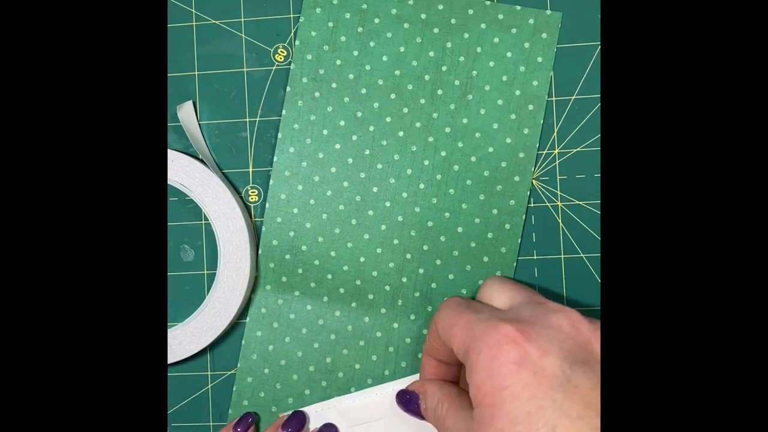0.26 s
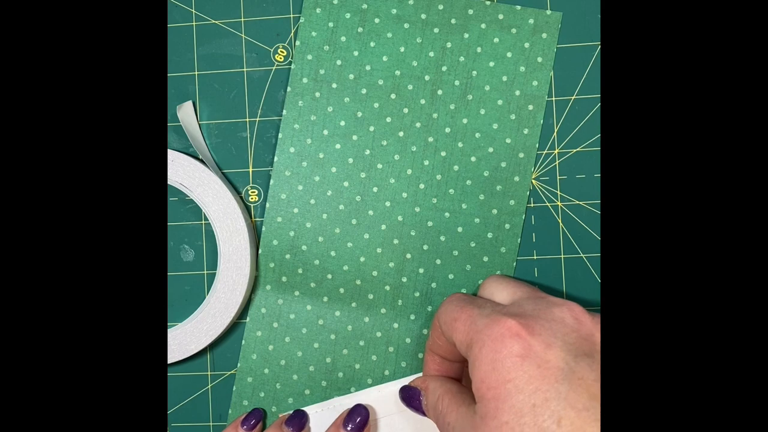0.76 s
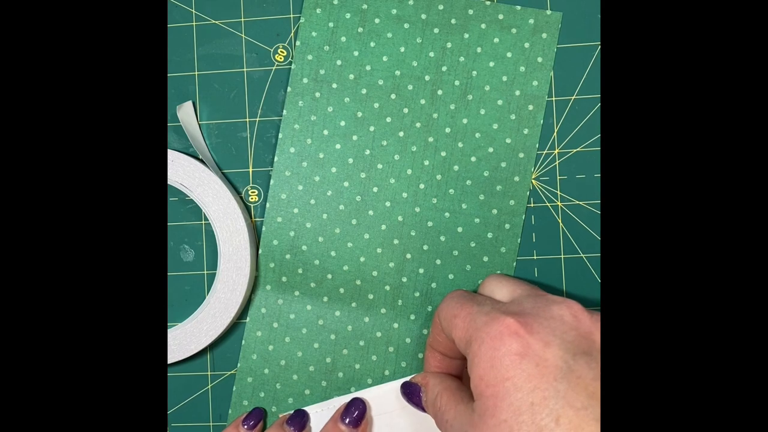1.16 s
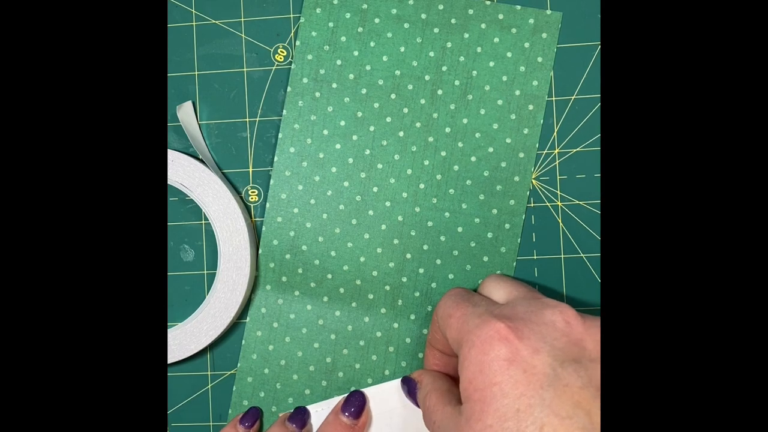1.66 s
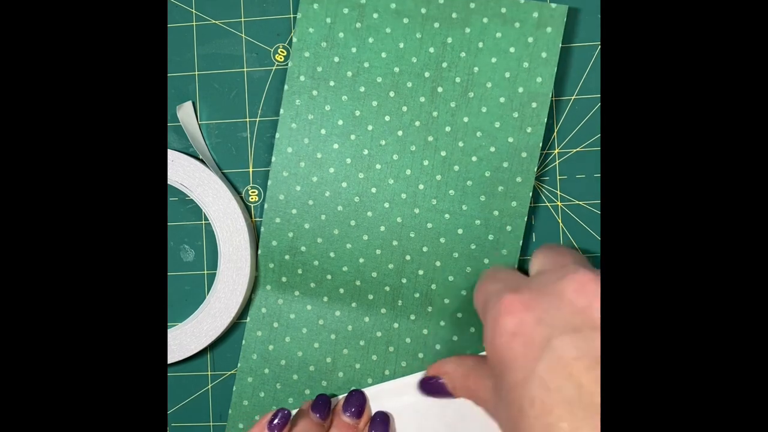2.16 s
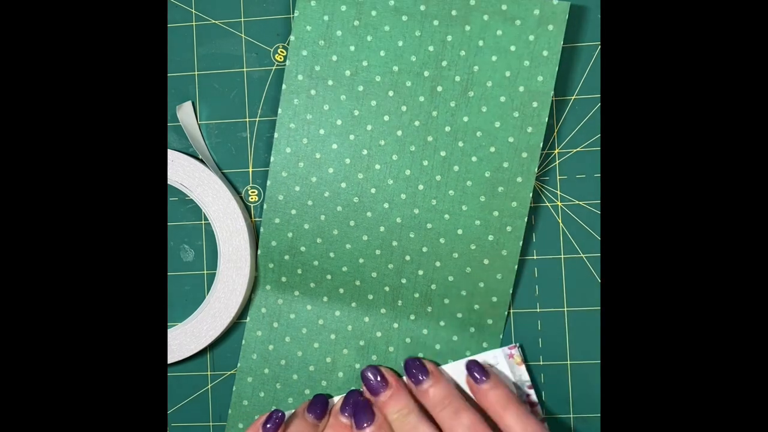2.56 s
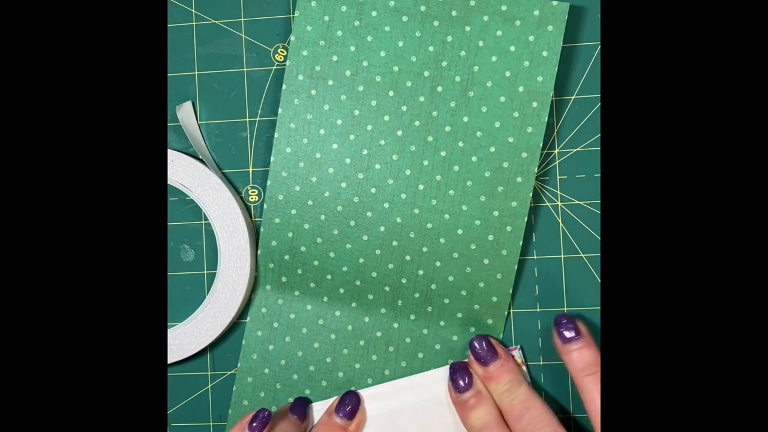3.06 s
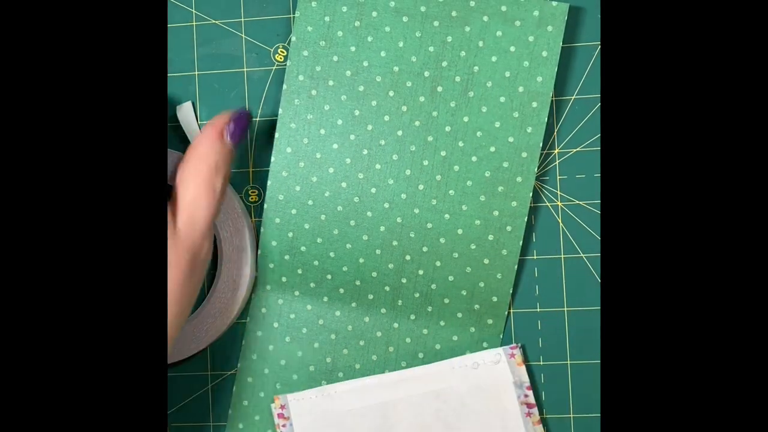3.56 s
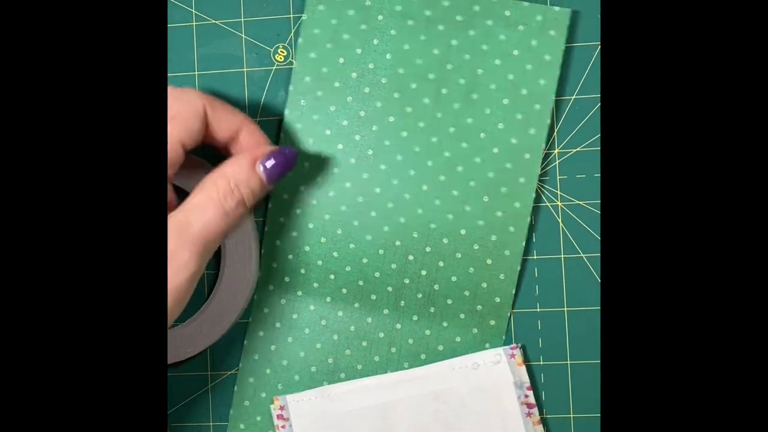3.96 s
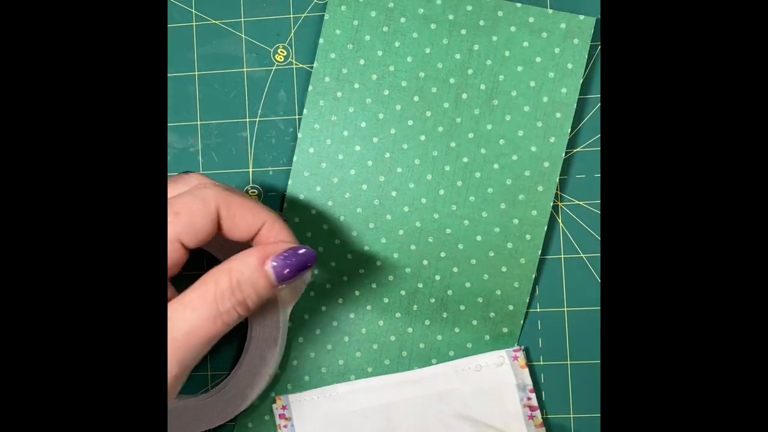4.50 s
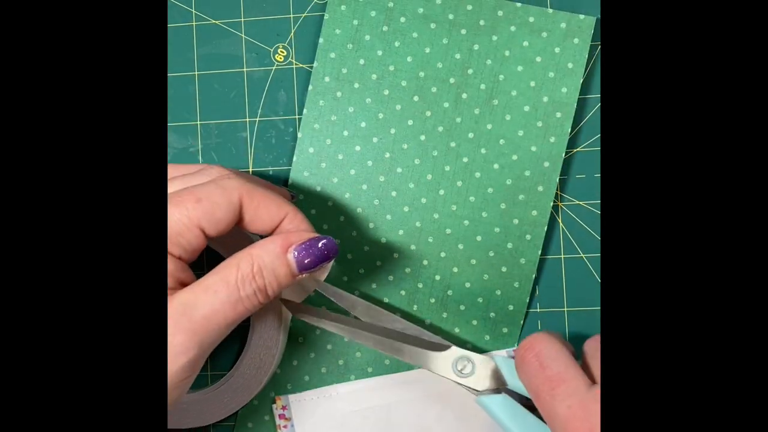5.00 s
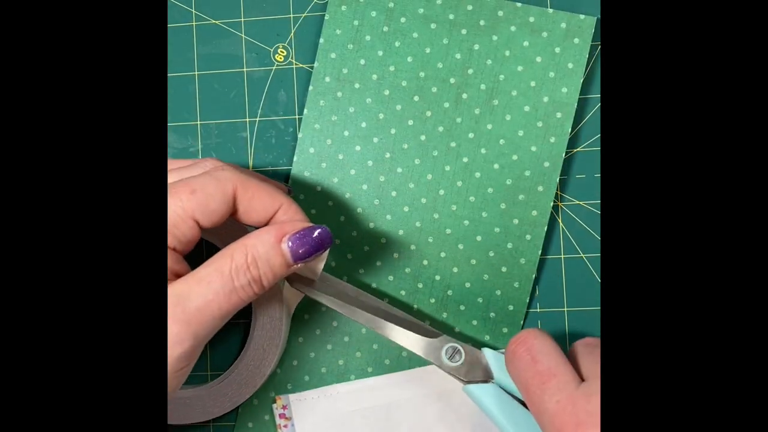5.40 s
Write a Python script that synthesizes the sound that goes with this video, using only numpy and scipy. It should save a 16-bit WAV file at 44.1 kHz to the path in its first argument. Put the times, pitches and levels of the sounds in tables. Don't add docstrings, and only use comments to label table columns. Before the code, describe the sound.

A steady low fan and mains hum sit under faint, tiny bubble-like drips. Hands barely stir the paper, then smooth and fold it with rustles, dry cracks and dull table thuds. A cardboard tape roll clatters and booms, the loudest moment. Quiet handling follows, then one bright metallic snip near the end. Close overhead phone, indoors, short reverberation.

```python
import sys
import numpy as np
from scipy import signal
from scipy.fft import rfft, irfft, next_fast_len
from scipy.io import wavfile
from scipy.ndimage import map_coordinates

SR = 44100
rng = np.random.default_rng(int(sys.argv[2]) if len(sys.argv) > 2 else 0)


def volts_from_db(level):
    exponent = np.asarray(level, float) / 20
    return 10 ** exponent


def store_pcm(level_fs):
    pcm = np.round(np.clip(level_fs, -1, 1) * 32767).astype(np.int16)
    wavfile.write(sys.argv[1], SR, np.atleast_2d(pcm).T)


N = 248724

# (start [s], hold [s], crease [dB], hiss re crease [dB])
RUBS = [(0, 0.013, -63, -28), (0.198, 0.0057, -71, 5), (.285, 0, -76, 9), (0.677, 0, -77, 7),
        (1.31, 0, -76, 8), (1.753, 0.074, -78, 3), (1.893, 0.038, -49, -2), (1.974, 0.055, -56, -3),
        (2.101, 0, -58.5, 11), (2.22, 0.023, -45.5, 7.5), (2.374, 0.11, -61, 4), (2.59, 0.032, -49, 6.5),
        (2.664, 0.13, -57, -0.5), (2.822, 0.15, -55.5, 4), (2.99, 0.000039, -47, 9), (3.103, 0.1, -61, 1),
        (3.228, 0, -43.5, -1), (3.427, 0.25, -61.5, -13), (3.73, 0.035, -45, -9.5),
        (3.803, 0.031, -49, -32.5), (3.962, 0.05, -44, -29), (3.99, 0, -51.5, 4), (4.04, 0, -37.5, 0.5),
        (4.076, 0.022, -39.5, -4), (4.14, 0, -49, -1), (4.262, 0.015, -58.5, -0.5), (4.283, 0.056, -69, 22),
        (4.36, 0.14, -65, -2.5), (5.287, 0, -73.5, 7), (5.435, 0.061, -69.5, 3), (5.459, 0, -53, 10.5),
        (5.49, .03, -57.5, 11.5), (5.544, 0.011, -45, 12), (5.583, 0, -67, 8), (5.64, 0.0079, -42, -30)]
# (start [s], hold [s], level [dB])
PRESSES = [(0, 0.06, -54), (.3, 0.26, -57.5), (1.4, 0.25, -62), (1.6, 0.018, -57), (1.72, .02, -58),
           (1.78, .04, -56.5), (1.92, 0.0078, -37.5), (2.11, 0.03, -43.5), (2.22, 0.018, -43.5),
           (2.47, 0.0086, -48.5), (2.58, 0, -42), (2.74, 0, -43), (2.99, 0.13, -46), (3.63, 0.11, -53),
           (3.68, 0.13, -42), (3.965, 0, -34), (4.0, 0.15, -42.5), (4.17, 0.019, -35), (4.47, 0.058, -59)]
# (frequency [Hz], density [dB per Hz])
PAPER_BODY = [(150, 9.5), (400, 5.5), (1300, 4), (2200, -7), (4000, -24.5)]
PAPER_CREASE = [(900, -11.5), (1900, 3.5), (3400, 5), (4400, -4.5), (5600, 0.5), (7500, -11), (9500, -35.5)]
PAPER_HISS = [(5500, -13.5), (8000, 3), (10000, 4.5), (12500, -3), (14500, 3.5), (15750, 1), (15900, -25.5)]
# (body [dB], crease [dB], hiss [dB])
RESTING_DB = (-62.5, -83.5, -83.5)
HELD_DB = (-78, -76, -77)
# (time [s], peak [dB], crack [dB])
TICKS = [(2.4385, -44.5, 20), (2.263, -45, 3), (.782, -49.5, 5), (1.0067, -49, 6), (1.3054, -54, 2.5),
         (3.962, -45, 18), (3.9772, -42, 16.5), (4.055, -42, 16), (4.254, -49, -7), (4.4594, -50, 9),
         (4.6125, -55.5, -8), (4.71, -52.5, 1), (4.98, -51, 8), (5.2408, -67, 16.5), (5.272, -50.5, 19.5),
         (5.5592, -36, 23.5), (5.638, -45.5, 15)]
# (time [s], peak [dB], ring [Hz], wood [dB], crack [dB])
SNAPS = [(.033, -44, 2280, -20, -9), (1.43, -46.5, 3000, -9, -28), (1.708, -50, 750, -12, -41),
         (1.7158, -52, 990, -18, -50), (1.725, -50, 1260, 5, -30), (1.7875, -45, 1500, -12, -30),
         (1.809, -49, 1270, -8, -8), (1.8657, -40.5, 2700, -14, -12), (1.9119, -36, 1710, 10, -11),
         (2.0118, -23.5, 1900, -7.5, 5.5), (2.0153, -29.5, 2100, -1, 7), (2.0187, -32.5, 2700, -9, 10),
         (2.048, -40, 1590, -5, -9), (2.088, -25.5, 1805, -11, -32), (2.2115, -38, 890, -6, -12),
         (2.439, -31.5, 2270, 3.5, -20), (2.5325, -37, 1540, -4.5, -10), (2.7357, -40.5, 1170, 7, -17),
         (2.9817, -35, 970, -31, -13), (3.0976, -44, 1370, -16, -19), (3.188, -44, 1310, -17, -8)]
# (time [s], peak [dB], ring [Hz], wood [dB], edge [dB])
KNOCKS = [(3.5555, -29, 1640, 1.5, -6), (3.5893, -32, 1820, 3.5, -1.5), (3.6713, -24.5, 1450, -19, -9),
          (3.6922, -32, 1380, 0.5, 2.5), (3.7059, -19, 940, 2.5, 3.5), (3.7226, -10, 2110, -8.5, 4.5),
          (3.7237, -7, 2600, -19, -27.5), (3.7252, -10.5, 2470, -15.5, -19.5),
          (3.7359, -22, 2160, -0.5, -33.5), (3.7481, -31, 2160, -21.5, -8.5), (3.875, -33, 1300, 4, -23),
          (3.935, -30.5, 940, 3, -22), (3.9574, -25.5, 1240, -4.5, -22), (3.9624, -22, 1720, -0.5, 0),
          (4.0223, -11, 2120, -9.5, -29), (4.033, -23, 1714, -18, -2), (4.056, -20.5, 2600, -8.5, 3),
          (4.071, -28, 1640, -24, -18), (4.1305, -13, 1557, -25, -5.5), (4.13, -42, 2940, -32, -23),
          (4.1433, -19.5, 948, -24.5, -34), (5.529, -42, 3380, -25, -6), (5.5586, -13, 2600, -26, 4),
          (5.5596, -13.5, 2980, -14.5, -7.5), (5.6375, -26.5, 3400, -35, -15)]
# (time [s], peak [dB], ring [Hz])
CRACKLES = [(1.7127, -51, 1000), (1.7198, -47, 1010), (1.7225, -60, 2900), (1.73, -60, 1510),
            (1.742, -54, 2900), (1.764, -66, 3200), (1.7885, -55, 2800), (1.809, -49, 2800),
            (1.847, -51, 2290), (1.882, -43, 2980), (1.889, -43, 1700), (2.0997, -48, 1800),
            (2.152, -42, 1910), (2.552, -37, 1570), (2.567, -41, 650), (2.578, -35.5, 2800),
            (2.62, -46, 2300), (2.965, -43, 1360), (2.982, -34.5, 2800), (3.071, -53, 1090),
            (3.128, -51, 1400), (3.221, -41, 2260), (3.647, -48, 1720), (3.6703, -26.5, 2700),
            (3.914, -43, 1400), (3.936, -30, 2300), (3.9426, -31, 2600), (3.948, -40, 1870),
            (3.9561, -23, 2330), (3.994, -30.5, 1800), (4.013, -34, 1790), (4.0384, -22, 1650),
            (4.045, -29.5, 2400), (4.052, -28.5, 1800), (5.5534, -33, 2810), (5.5633, -42, 2550),
            (5.5649, -23, 2980), (5.571, -26, 2300), (3.729, -20, 2300), (3.7418, -28, 2500),
            (3.755, -27.5, 2400), (4.156, -37, 1680), (4.179, -26, 1090), (4.192, -34, 2900)]
# (time [s], peak [dB], edge re crack [dB])
FLICKS = [(1.866, -46, -9), (2.1967, -41, -9), (2.2112, -31, -13), (2.5996, -30, -12), (2.9759, -33, -14),
          (3.5552, -41.5, -6), (3.5893, -39.5, -6), (3.6705, -35.5, -3.5), (3.6929, -26.5, -13),
          (3.7058, -26.5, -7.5), (3.7222, -20.5, -14.5), (3.9068, -43.5, -10), (4.0056, -33.5, -15),
          (4.0201, -30, 9.5), (4.057, -19, -14), (4.1303, -24, -18), (5.5285, -35, -14)]
# (frequency [Hz], level [dB], t60 [s])
FLAP_MODES = [(390, -4, 0.054), (840, -1, 0.05), (924, -1, 0.041), (1253, 8, 0.033), (1934, -7, 0.053),
              (2390, -4, 0.045), (3320, -4.5, 0.027), (3820, -19, 0.045)]
ROLL_MODES = [(628, -2.5, 0.063), (943, -11, 0.045), (1056, -1, 0.052), (1141, 2.5, 0.043),
              (1680, -11, 0.025), (1748, -8.5, 0.054), (2600, -12, 0.033), (2870, -1.5, 0.012),
              (2950, -8, 0.01), (4160, -31, .02), (4800, -18, 0.0198)]
CORE_MODES = [(692, -6.5, .06), (1046, -14, 0.05), (1149, -7.5, .06), (1633, -11.5, .04), (2150, -6, 0.084),
              (2250, -8.5, 0.06), (2440, -8, .05), (2580, -6.5, 0.04), (2690, -8, .05), (2990, -8.5, 0.04),
              (4100, -13.5, .06), (4870, -8, 0.061), (5195, -11, .05), (5927, -17, .04)]
PAD_MODES = [(1080, -10, .035), (1190, 8, .04), (1310, -7, .035)]
# (time [s], level [dB])
FLAP_SLAPS = [
    (2.4388, -28),
]
ROLL_DROPS = [
    (4.1306, -10.5),
    (4.0225, -31.5),
]
CORE_CRACKS = [
    (3.7222, -13),
    (3.725, -16.5),
]
PAD_TAPS = [
    (1.7128, -53),
    (1.7156, -41.5),
]
# (time [s], peak [dB], frequency [Hz], t60 [s])
THUMPS = [(2.1055, -24, 139, 0.044), (1.915, -31, 236, 0.043), (2.017, -26.5, 116, 0.18),
          (2.1125, -17.5, 72.3, 0.15), (2.227, -31.5, 66.4, 0.1), (2.445, -23, 117, 0.077),
          (2.737, -28, 109, 0.069), (3.559, -25.5, 163, 0.094), (3.592, -20.5, 133, 0.1),
          (3.726, -21, 244, 0.086), (3.738, -23, 118.7, 0.19), (3.877, -28, 135.4, 0.095),
          (4.026, -19.5, 131, 0.073), (4.133, -21, 126.5, 0.089), (4.16, -29.5, 74.6, 0.22)]
# (time [s], peak [dB], frequency [Hz], t60 [s])
BOOMS = [(2.09, -35.5, 303, 0.062), (3.03, -34.5, 254, 0.098), (3.728, -25.5, 298, 0.19),
         (4.137, -30, 307, 0.099), (3.706, -28.5, 612, 0.096), (3.556, -30.5, 403, 0.11),
         (3.591, -22, 390, 0.032), (3.721, -20, 577, 0.084), (3.877, -34.5, 313, 0.19),
         (4.02, -26.5, 295.6, 0.093), (4.135, -22.5, 550, 0.13)]
# (start [s], hold [s], level [dB])
BLADE_SLIDES = [
    (5.445, .02, -60),
    (5.5, .02, -58),
    (5.535, .03, -47),
    (5.59, .015, -58),
]
# (time [s], bubble [Hz], level [dB])
DRIPS = [(.301, 4030, -59.5), (.36, 3700, -62), (.445, 4350, -57.5), (.499, 4800, -64), (.616, 4100, -64),
         (.645, 4140, -61), (.675, 3570, -56), (.786, 4400, -64), (.785, 2780, -66), (.82, 3520, -60.5),
         (.86, 3800, -73), (1.64, 4200, -73), (4.33, 4700, -53), (4.77, 3970, -75), (1.08, 5030, -60),
         (1.125, 4570, -60), (1.197, 4850, -54), (1.255, 3750, -56), (1.305, 2850, -62), (1.43, 4050, -64),
         (1.562, 3040, -67.5), (4.195, 4240, -47.5), (4.378, 4520, -47), (4.425, 4020, -54),
         (4.823, 4200, -54), (4.85, 3090, -53), (5.086, 3810, -59), (5.35, 4160, -49)]
DROPLETS = [(.04, 5770, -61.5), (.335, 6400, -68), (.4, 7100, -71), (.58, 7000, -68.5), (.675, 7040, -62),
            (.903, 5720, -62.5), (1.104, 5640, -60.5), (1.43, 7240, -64), (1.515, 6940, -61.5),
            (2.13, 6600, -53.5), (2.382, 6760, -51.5), (3.441, 5540, -62), (3.52, 6160, -56),
            (3.525, 7000, -66), (5.125, 7000, -58.5)]
# (frequency [Hz], density [dB per Hz])
FAN_RUMBLE = [(20, -23.5), (38, -15.5), (55, -0.5), (125, 1.5), (230, -6.5), (290, -14.5), (660, -29.5),
              (1200, -29)]
AIR_HISS = [(1400, -20), (1750, -27.5), (2300, -40), (7500, -46), (11100, -48.5), (14000, -70),
            (16000, -47)]
# (time [s], level [dB])
DRAUGHT = [(0, 12), (.3, 3.5), (.45, 0.5), (1.0, -3), (1.57, -4.5), (2.09, 11), (3.02, 2.5), (3.42, -2.5),
           (4.29, -7), (4.51, -6), (4.67, 4.5), (4.92, 4), (5.17, -11.5), (5.64, -3.5)]
# (mains multiple [1], rms [dB])
HUM = np.array([(1, -65.0), (2, -51.5), (3, -64), (4, -60.0), (5, -67), (7, -80.0), (14, -79.5),
       (19, -105.5), (23, -92.0), (24, -69.5), (25, -94.5), (26, -78.0), (28, -73.5), (30, -79.0)])
# (frequency [Hz], likeness [0..1])
NEAR_LIKENESS = [(250, .8), (600, .3), (1100, .4), (2000, .9), (5300, .6), (7200, .85), (8200, .985),
                 (16000, .995)]
AIR_LIKENESS = [(60, 0.99), (290, 0.79), (640, .15), (1400, 0.1), (3100, 0.75), (7000, 0.31), (8600, 0.37),
                (15000, 0.9)]
# (frequency [Hz], t60 [s])
ROOM_T60 = [(150, 0.75), (500, 0.037), (1500, 0.14), (4000, 0.18), (10000, 0.1)]
# (frequency [Hz], phase [half turns])
PORT_PHASE = [(1700, 0), (2400, .2), (5900, .4), (7200, 0), (8600, -1), (11300, -2), (13500, -3),
              (16000, -4)]
# (frequency [Hz], level [dB])
PORT_TILT = [(300, 0), (1500, -1), (3100, -4.5), (4400, -1.5), (5600, -6.5), (7500, -1), (8400, 3.2)]
# (frequency [Hz], gain [dB])
MICROPHONE = [(20, -14), (45, 0), (13000, 0), (14800, 4), (15720, 10), (15860, -20), (16800, -26),
              (17200, -45)]

LIFTED_S = 4.4
RISE_DB_PER_S, FALL_DB_PER_S = 301.5, 354.5
PATCH_DB, PATCH_HZ, PATCH_S = 3.5, 696, .025
SMOOTH_ABOVE_HZ = 5000
TICK_HZ, TICK_WOOD_DB, TICK_EDGE_DB = 2700, -15, -11
SNAP_EDGE_DB = -2.5
KNOCK_CRACK_DB = -37
DULL_DB = -27
RATTLE_T60_S = 0.015
SKEW_RAD, SKEW_HZ = 1.2, 750
SWELL_CYCLES, RIGHTWARD = 1, .3
BLADE_LOW_HZ, BLADE_HIGH_HZ = 7000, 10800
AIR_DB, DUCT_DB, DUCT_HZ, MAINS_HZ = -40.5, -59.5, 228.8, 60.52


def rms_one(x):
    return x / np.sqrt(np.mean(x ** 2) + 1e-20)


def at_hz(points, hz):
    table_hz, values = np.transpose(points)
    return np.interp(np.log(hz + 1), np.log(table_hz), values)


def shaped(x, gain):
    size = next_fast_len(x.shape[-1])
    spectrum = rfft(x, size) * gain(np.fft.rfftfreq(size, 1 / SR))
    return irfft(spectrum, size)[..., :x.shape[-1]]


def band(x, low_hz, high_hz):
    edges_hz = [low_hz, min(high_hz, .45 * SR)]
    return signal.sosfilt(signal.butter(2, edges_hz, "band", fs=SR, output="sos"), x)


def drift(rate_hz):
    steps = rng.standard_normal(N // 100 + 402)
    lowpass = signal.butter(2, rate_hz, fs=SR / 100, output="sos")
    slow = rms_one(signal.sosfilt(lowpass, steps)[400:])
    return np.interp(np.arange(N) / 100, np.arange(len(slow)), slow)


def add(track, sound, s):
    at = round(s * SR)
    track[..., at:at + sound.shape[-1]] += sound[..., :N - at]


def spread(pair, likeness):
    mid = shaped(pair[0], lambda hz: np.sqrt(1 + np.clip(at_hz(likeness, hz), 0, 1)))
    side = shaped(pair[1], lambda hz: np.sqrt(1 - np.clip(at_hz(likeness, hz), 0, 1)))
    return np.array([mid + side, mid - side]) / np.sqrt(2)


def strokes(rows, idle_db):
    t, power = np.arange(0, N, 32) / SR, 0
    for s, hold_s, db in rows:
        rise_db = RISE_DB_PER_S * np.maximum(s - t, 0)
        fall_db = FALL_DB_PER_S * np.maximum(t - s - hold_s, 0)
        power = power + volts_from_db(db - rise_db - fall_db) ** 2
    return np.sqrt(np.interp(np.arange(N) / SR, t, power) + volts_from_db(idle_db) ** 2)


def patchy(x):
    cells = signal.stft(x, nperseg=256)[2]
    seeds = rng.standard_normal((128, 1024))
    hz = np.arange(cells.shape[1]) * SR / 256
    t = np.arange(cells.shape[2]) * 128 / SR
    where = np.meshgrid(hz / PATCH_HZ, t / PATCH_S, indexing="ij")
    depth_db = PATCH_DB / (1 + (where[0] * PATCH_HZ / SMOOTH_ABOVE_HZ) ** 2)
    gain = volts_from_db(depth_db * map_coordinates(seeds, where, order=1, mode="mirror"))
    return signal.istft(cells * gain, nperseg=256)[1][:, :N]


def rustle():
    lifted = np.clip((np.arange(N) / SR - LIFTED_S) / .5, 0, 1)
    creases = [row[:3] for row in RUBS]
    hisses = [(s, hold_s, db + hiss_db) for s, hold_s, db, hiss_db in RUBS]
    sizes = volts_from_db(3.2 * np.minimum(rng.exponential(1, (2, N)), 5))
    grains = rng.standard_normal((2, N)) * sizes * volts_from_db(drift(65.0))
    colours, moves = (PAPER_BODY, PAPER_CREASE, PAPER_HISS), (PRESSES, creases, hisses)
    clumps_db, out = (2.2, 1.6, 0.8), 0
    for colour, rows, rest_db, held_db, clump_db in zip(colours, moves, RESTING_DB, HELD_DB, clumps_db):
        clumped = grains * volts_from_db(clump_db * drift(30.0))
        layer = rms_one(shaped(clumped, lambda hz: volts_from_db(at_hz(colour, hz))))
        idle_db = rest_db + (held_db - rest_db) * lifted
        out = out + layer * volts_from_db(-4.0) * strokes(rows, idle_db)
    return patchy(out)


def contacts():
    ticks = [(s, db, TICK_HZ, TICK_WOOD_DB, crack_db + TICK_EDGE_DB, crack_db) for s, db, crack_db in TICKS]
    snaps = [(*row, crack_db + SNAP_EDGE_DB, crack_db) for *row, crack_db in SNAPS]
    knocks = [(*row, edge_db, edge_db + KNOCK_CRACK_DB) for *row, edge_db in KNOCKS]
    crackles = [(*row, DULL_DB, DULL_DB, DULL_DB) for row in CRACKLES]
    flicks = [(s, db + DULL_DB, TICK_HZ, 0, edge_db - DULL_DB, -DULL_DB) for s, db, edge_db in FLICKS]
    return ts if (ts := ticks + snaps + knocks + crackles + flicks) else []


def hits():
    out, t = np.zeros((3, N)), np.arange(SR // 20) / SR
    for s, db, hz, wood_db, edge_db, crack_db in contacts():
        noise = rng.standard_normal((3, len(t))) * [[.35], [.35], [.03]]
        rattle = (noise + (t == 0) * 1.45) * volts_from_db(-60 * t / RATTLE_T60_S)
        brief = rattle * volts_from_db(-60 * t / 0.047)
        ring = band(rattle, hz / 1.13, hz * 1.13) * [[1], [1], [.4]] + .55 * rattle
        ring = band(band(ring, hz / 1.7, hz * 1.7), hz / 3, hz * 1.9)
        wood = band(band(rattle, 230, 910), 166.8, 1200)
        edge, crack = band(brief, 3900, 7000), band(brief, 8700, 15800)
        parts = (ring, 0), (wood, wood_db), (edge, edge_db), (crack, crack_db)
        sound = sum(volts_from_db(db + g) * p / np.abs(p).max(axis=1, keepdims=True) for p, g in parts)
        sound[2] *= volts_from_db(-8 * (s > LIFTED_S))
        add(out, sound, s)
    return out


def bodies():
    out, t = np.zeros((3, N)), np.arange(SR // 8) / SR
    struck = ((FLAP_SLAPS, FLAP_MODES), (ROLL_DROPS, ROLL_MODES),
              (CORE_CRACKS, CORE_MODES), (PAD_TAPS, PAD_MODES))
    for blows, modes in struck:
        hz, mode_db, t60_s = np.transpose(modes)[..., None]
        fade = (1 - np.exp(-t * hz / SWELL_CYCLES)) * volts_from_db(mode_db - 60 * t / t60_s)
        turn = 2 * np.pi * hz * t
        skew = SKEW_RAD / (1 + np.log2(hz / SKEW_HZ) ** 2)
        askew = skew * np.cos(turn) - RIGHTWARD * np.sin(turn)
        rings = fade * [np.sin(turn), askew, 0.32 * np.sin(turn)]
        for s, db in blows:
            add(out, volts_from_db(db) * (rng.uniform(0.62, 0.91, len(modes)) @ rings), s)
    return out


def thumps():
    out, t = np.zeros((2, N)), np.arange(SR // 2) / SR
    for s, db, hz, t60_s in list(THUMPS) + list(BOOMS):
        turn = 2 * np.pi * hz * t + SKEW_RAD * (hz / SKEW_HZ) ** 2 * np.array([[-1], [1]])
        fade = volts_from_db(-60 * t / t60_s)
        modes = np.sin(turn) + .5 * np.sin(1.45 * turn) * fade
        add(out, -volts_from_db(db) * modes * (1 - np.exp(-t / 0.003)) * fade, s)
    return out


def blades():
    hiss = band(rng.standard_normal((2, N)), BLADE_LOW_HZ, BLADE_HIGH_HZ)
    return rms_one(band(hiss, BLADE_LOW_HZ, BLADE_HIGH_HZ)) * strokes(BLADE_SLIDES, -120)


def drips():
    out, t = np.zeros(N), np.arange(SR // 40) / SR
    for s, hz, db in list(DRIPS) + list(DROPLETS):
        tone = np.sin(2 * np.pi * hz * t * (.97 + .003 * hz * t))
        bubble = tone * np.exp(-t * hz / 5.5) * np.minimum(t * hz / 2.5, 1)
        add(out, volts_from_db(db + 14.5) * bubble, s)
    return out


def room(x, build_up_s):
    t, tail = np.arange(SR // 2) / SR, 0
    for hz in 90 * 2. ** np.arange(8):
        octave = band(rng.standard_normal((2, len(t))), hz / np.sqrt(2), hz * np.sqrt(2))
        tail = tail + octave * volts_from_db(-60 * t / at_hz(ROOM_T60, hz))
    tail = tail * (1 - np.exp(-t / build_up_s))
    tail = tail / np.sqrt(np.sum(tail ** 2) / 2)
    return signal.fftconvolve(x[None], tail, axes=1)[:, :N]


def fan():
    colour = list(FAN_RUMBLE) + list(AIR_HISS)
    noise = shaped(rng.standard_normal((2, N)), lambda hz: volts_from_db(at_hz(colour, hz)))
    return volts_from_db(AIR_DB - 5.5 + 0.93 * drift(14.0)) * spread(rms_one(noise), AIR_LIKENESS)


def duct():
    drone = band(rng.standard_normal(N), DUCT_HZ / 1.1, DUCT_HZ)
    drone = rms_one(band(drone, DUCT_HZ / 1.2, DUCT_HZ * 1.2))
    draught_db = np.interp(np.arange(N) / SR, *np.transpose(DRAUGHT))
    return volts_from_db(DUCT_DB + draught_db + 1.1 * drift(6.0)) * drone


def mains_hum():
    out, phase = np.zeros(N), 2 * np.pi * MAINS_HZ * np.arange(N) / SR
    for k, db in HUM:
        level_db = db + (3.5 - 0.061 * k) * drift(6.9 + 0.23 * k)
        out += np.sqrt(2) * volts_from_db(level_db) * np.sin(round(k) * phase + rng.uniform(0, 8.4))
    return out


def scene():
    paper, knocks = rustle(), hits() + bodies()
    echoes = volts_from_db(-2.0) * room(knocks[2], build_up_s=0.00074) + volts_from_db(-11.0) * room(paper[0], build_up_s=0.0074)
    near = spread(knocks[:2] + echoes + paper, NEAR_LIKENESS) + thumps() + blades()
    far_drips = room(drips(), build_up_s=0.005) * volts_from_db([[-1.5], [1.5]])
    return near + far_drips + fan() + duct() + mains_hum()


def band_limit(x):
    return signal.sosfilt(signal.butter(12, 17160, fs=SR, output="sos"), x)


def record(dry):
    ports = shaped(dry, lambda hz: volts_from_db(at_hz(MICROPHONE, hz)))
    lead = np.transpose(PORT_PHASE)
    left = shaped(ports[0], lambda hz: volts_from_db(at_hz(PORT_TILT, hz) / 2))
    right = shaped(ports[1], lambda hz: volts_from_db(-at_hz(PORT_TILT, hz) / 2)
                   * np.exp(1j * np.pi * np.interp(hz, *lead)))
    mix = np.clip([left, right], -1, 1)
    return band_limit(mix)


dry = scene()
out = record(dry)
store_pcm(out)
```